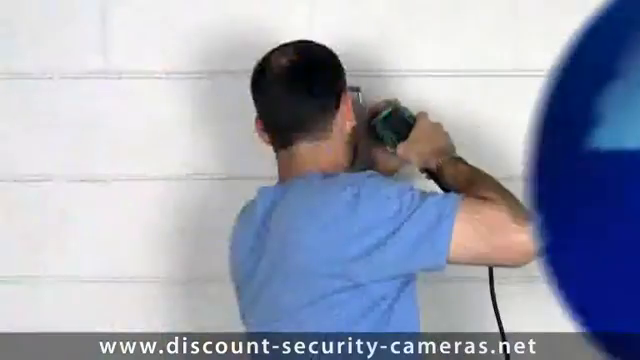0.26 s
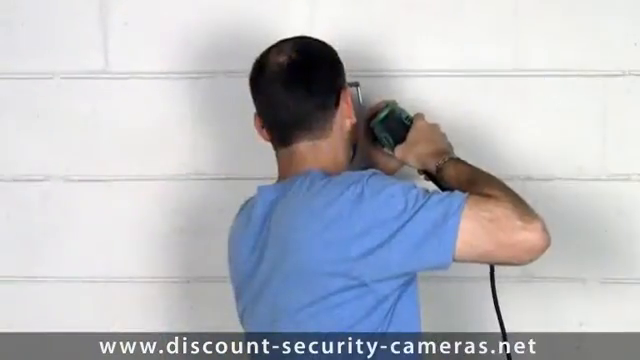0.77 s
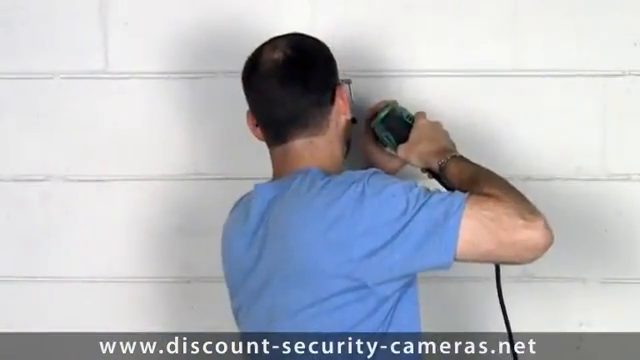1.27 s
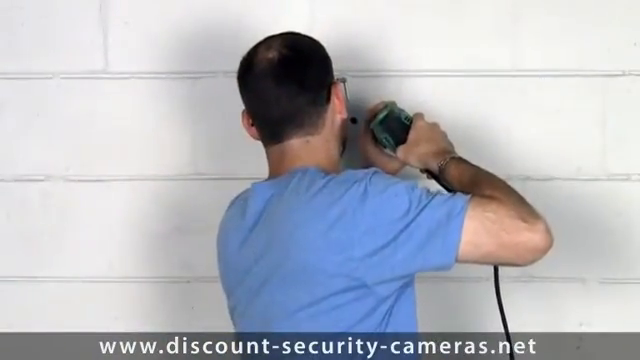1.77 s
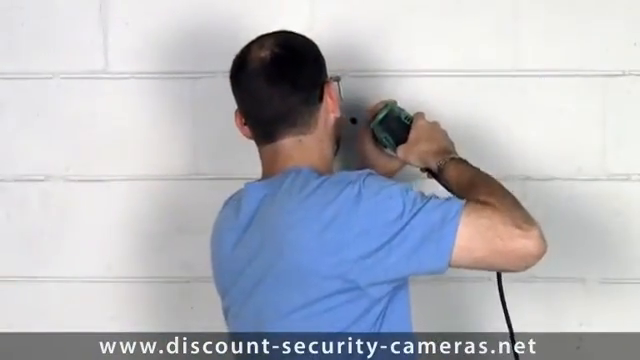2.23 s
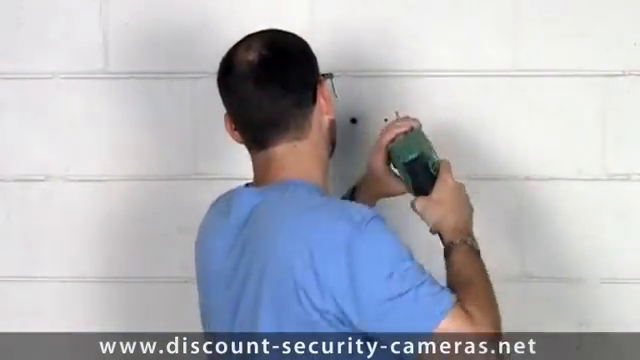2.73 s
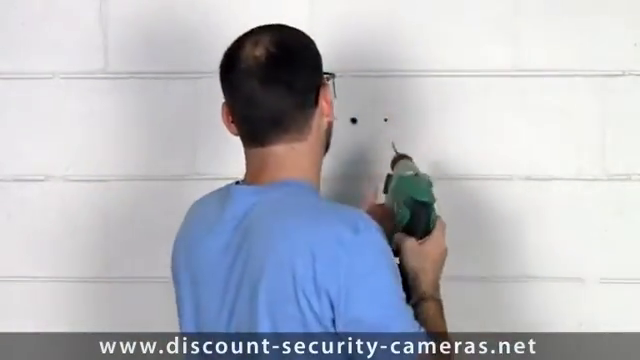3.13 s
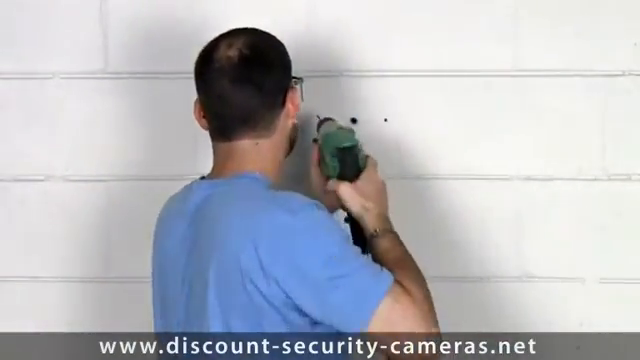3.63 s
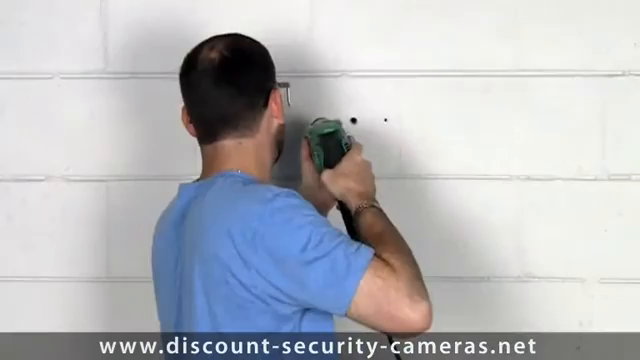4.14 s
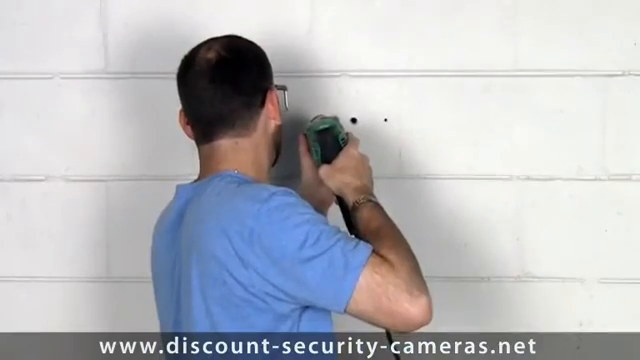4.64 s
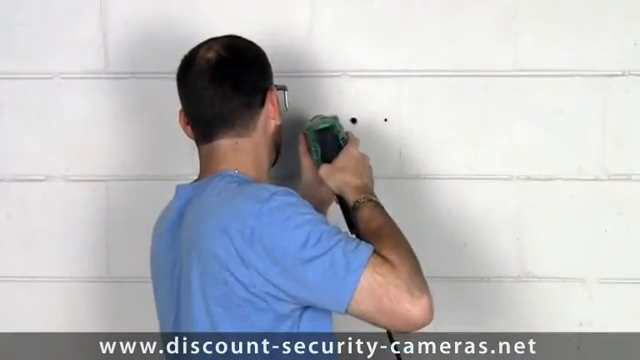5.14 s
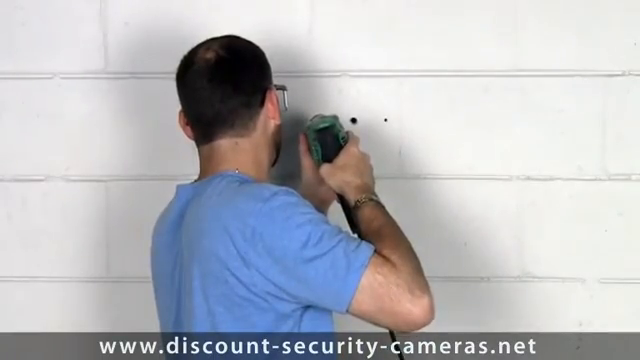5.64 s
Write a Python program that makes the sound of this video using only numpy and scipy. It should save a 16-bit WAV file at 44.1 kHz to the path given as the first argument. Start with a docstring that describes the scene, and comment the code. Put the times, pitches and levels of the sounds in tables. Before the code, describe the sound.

In a hard-walled room, an electric drill bores into masonry, backs out, then its motor coasts slowly to a stop.

```python
"""In a hard-walled room, a corded drill grinds into a concrete block wall, backs off, knocks and
scrapes once more, runs free and coasts to a stop. Grit rings the wall and the bit; gears, fan and
commutator sing at multiples of the armature speed. Under it lie room rumble and a few soft thuds.
One microphone feeds the left input; the idle right input holds only faint hiss."""
import sys
import numpy as np
from scipy import signal
from scipy.fft import rfft, irfft
from scipy.io import wavfile
from scipy.ndimage import uniform_filter1d

SR = 44100
rng = np.random.default_rng(int(sys.argv[2]) if len(sys.argv) > 2 else 0)


def generate_wav(sig):
    """Save sig (samples, or channels by samples) to the path in sys.argv[1] as 16-bit PCM at SR."""
    pcm = np.round(np.clip(np.atleast_2d(sig).T, -1, 1) * 32767).astype(np.int16)
    wavfile.write(sys.argv[1], SR, pcm)


N = 260171
TIME = np.arange(N) / SR
RELEASE_S, RELEASE_SPEED = 2.36, 411  # the trigger is let go at full speed, in rev/s
COASTED_S = np.maximum(TIME - RELEASE_S, 0)

# The gearbox resonance. Each row: pitch in Hz, width in Hz, level in dB.
GEARBOX_RING = [(2042, 35, 6.5)]


def gain_of(db):
    """Decibels to gain."""
    return 10 ** (np.asarray(db) / 20)


def unit_rms(x):
    """Scales to rms 1."""
    return x / np.sqrt(np.mean(x ** 2) + 1e-20)


def curve(rows):
    """Joins (seconds, value) points into an envelope."""
    return np.interp(TIME, *np.transpose(rows))


def colour(hz, broad, rings=()):
    """Gain at hz of a broad spectrum with resonances on top, which pass little below their pitch."""
    points_hz, points_db = np.transpose(broad)
    power = gain_of(2 * np.interp(np.log(hz + 1), np.log(points_hz + 1), points_db))
    peaks = (gain_of(2 * db) * np.minimum(hz / pitch, 1) ** 4 / (1 + (2 * (hz - pitch) / width) ** 2)
             for pitch, width, db in rings)
    return np.sqrt(power + sum(peaks))


def ringing(hz, rings):
    """Gain at hz of steep resonances alone."""
    return sum(gain_of(db) / (1 + (2 * (hz - pitch) / width) ** 2) for pitch, width, db in rings)


def rolloff(hz, corner_hz, steepness):
    """Gain at hz of a low-pass."""
    return 1 / (1 + (hz / corner_hz) ** steepness)


def filtered(x, gain):
    """Passes x through gain(hz) and scales to rms 1."""
    hz = np.fft.rfftfreq(2 ** 19, 1 / SR)
    return unit_rms(irfft(rfft(x, 2 ** 19) * gain(hz))[:N])


def waver(seconds):
    """Slow random drift of rms 1."""
    size = int(seconds * SR)
    return unit_rms(uniform_filter1d(uniform_filter1d(rng.standard_normal(N), size), size))


def grit(per_s, spread_db):
    """Sparse clicks of uneven size."""
    size = gain_of(spread_db * np.minimum(rng.exponential(1, N), 4)) * rng.standard_normal(N)
    return unit_rms(size * (rng.random(N) < per_s / SR))


def idle_hiss(live):
    """Hiss of the idle input; a gate keyed by the live input mutes it, treble first."""
    # The hiss colour. Each row: frequency in Hz, density in dB.
    spectrum = [(20, -3), (90, -7), (200, -18), (400, -19), (12000, -20.5)]
    hiss = gain_of(-70) * filtered(rng.standard_normal(N), lambda hz: colour(hz, spectrum))
    bass = signal.sosfiltfilt(signal.butter(4, 200, fs=SR, output="sos"), hiss)
    key_db = 10 * np.log10(abs(uniform_filter1d(live ** 2, 9000)) + 1e-12)
    bass_gate = np.clip((-26 - key_db) / 9, 0, 1)
    treble_gate = np.clip((-41 - key_db) / 1.44, 0, 1)
    return bass * bass_gate + (hiss - bass) * treble_gate


def room_rumble():
    """Low room tone over microphone hiss, swelling in over the first second, then settling a little."""
    # The room tone's colour. Each row: frequency in Hz, density in dB.
    spectrum = [(18, -39.5), (30, -9.5), (64, -5.5), (153, -2), (293, -8.5), (390, -8), (700, -14.5),
                (1080, -18.5), (2000, -25.5), (4000, -32), (9000, -35), (12000, -37.5)]
    # Its swell. Each row: time in seconds, gain in dB.
    swell = [(0, -30), (.9, 6.5), (1.3, 0.5)]
    rumble = filtered(rng.standard_normal(N), lambda hz: colour(hz, spectrum))
    return gain_of(-60 + curve(swell) + waver(0.11)) * rumble


def thuds():
    """Soft thuds near the microphone, each a few low cycles under a smooth window."""
    # The thuds. Each row: start in seconds, peak in dB, pitch in Hz, length in seconds.
    bumps = [(1.699, -48, 100, .03), (2.67, -43, 110.6, 0.015), (2.722, -38, 80, 0.017),
             (4.501, -47.5, 100, 0.023), (4.838, -43.5, 114, 0.018), (4.98, -31, 104, 0.023),
             (5.045, -46, 110, 0.019)]
    out = np.zeros(N)
    for start, db, hz, length in bumps:
        t = np.arange(round(length * SR)) / SR
        cycles = -np.cos(2 * np.pi * hz * (t - length / 2))
        out[round(start * SR):][:len(t)] += gain_of(db) * np.hanning(len(t)) * cycles
    return out


def armature_speed():
    """Speed in rev/s: driven, then braked to rest by steady friction and drag that grows with speed."""
    # The motor under power. Each row: time in seconds, speed in rev/s.
    driven = [(0, 371), (1.22, 372), (1.6, 396), (1.8, 400), (2.3, 410), (2.36, 411)]
    drag, friction = 0.2153, 447.3  # 1/s; rev/s at which drag equals friction
    coasting = (RELEASE_SPEED + friction) * np.exp(-drag * COASTED_S) - friction
    return np.where(TIME < RELEASE_S, curve(driven), np.maximum(coasting, 0))


def speed_db(speed):
    """Speed in dB against full speed."""
    return 20 * np.log10(np.maximum(speed, 1) / RELEASE_SPEED)


def order_tone(angle, order, db, rough, flutter_db):
    """A tone at a multiple of the armature speed, with rough phase and fluttering level."""
    jitter = rough * waver(0.0041)
    level = np.sqrt(2) * gain_of(db + flutter_db * waver(0.012))
    return level * np.cos(order * angle + jitter + 2 * np.pi * rng.random())


def shaft_hum(angle):
    """Unbalance shakes the drill once a turn."""
    # The hum's envelope. Each row: time in seconds, level in dB.
    envelope = [(0, -65), (1.3, -56.5), (2.0, -56), (2.6, -57), (2.7, -69), (3.1, -80)]
    return order_tone(angle, 1, curve(envelope), rough=0.092, flutter_db=6.5)


def gearbox_rattle():
    """The running gears shake the gearbox ring, which fades after release."""
    ring = filtered(rng.standard_normal(N), lambda hz: ringing(hz, GEARBOX_RING))
    return gain_of(-46 - 22 * COASTED_S) * ring


def gear_song(speed, angle):
    """The gears sing once the load is off; resonances lift the tone that passes through them."""
    # The gear tones, in multiples of the armature speed, and their base levels in dB.
    orders = (5, 12, 17, 19, 24)
    levels_db = (-48, -52, -52, -65, -68.5)
    # A broader ring, crossed while speeding up. Each row: pitch in Hz, width in Hz, level in dB.
    lower_ring = [(1925, 80, -5)]
    free_s, rise_db_s, fade_db_s = 1.32, 110, 130
    song = np.zeros(N)
    for order, db in zip(orders, levels_db):
        lift = 0.75 + ringing(order * speed, GEARBOX_RING + lower_ring)
        song += lift * order_tone(angle, order, db, rough=0.11, flutter_db=-2.5)
    return gain_of(-rise_db_s * np.maximum(free_s - TIME, 0) - fade_db_s * COASTED_S) * song


def commutator_whine(speed, angle):
    """Brushes cross 24 uneven bars: a rough, falling whine that stands out while coasting."""
    # The partials: multiples of the armature speed, base levels in dB, dB lost per dB of speed lost.
    orders = (24, 48, 72, 96)
    levels_db = (-5.5, -9.5, -8, -10)
    slopes = (0.59, 0.46, 0.7, 0.72)
    # The whine's path to the air. Each row: frequency in Hz, gain in dB.
    path = [(1500, -33), (1950, 3), (3000, 4), (4500, 0.5), (6000, -0.5), (6800, 1), (8200, -12),
            (9300, -13)]
    # Rings the lowest partial sweeps through. Each row: pitch in Hz, width in Hz, level in dB.
    rings = [(2290, 820, 7), (3340, 640, 7.5), (4500, 410, 8.5), (7600, 1300, 3.5)]
    whine = np.zeros(N)
    for order, db, slope in zip(orders, levels_db, slopes):
        partial = order_tone(angle, order, db + slope * speed_db(speed), rough=0.68, flutter_db=4)
        whine += partial * colour(order * speed, path, rings if order == orders[0] else ())
    fade_in_db = np.minimum(75 * (TIME - RELEASE_S) - 22, 0)
    return gain_of(-51.5 + fade_in_db) * whine


def motor_noise(speed):
    """Fan air and brush fizz through the casing; rush and treble die first as the motor slows."""
    # The casing's broad voice. Each row: frequency in Hz, gain in dB.
    casing = [(100, -31), (300, -15), (700, -4), (1300, -4), (1720, -4.5), (2000, 2), (2900, 0),
              (3330, -5.5), (5000, -10.5), (5800, -15.5), (7000, -11.5), (8300, -12.5), (9300, -10.5),
              (12000, 4.5)]
    # Casing and vent resonances. Each row: pitch in Hz, width in Hz, level in dB.
    casing_rings = [(965, 170, -8), (1963, 48, 5), (2140, 39, 2.5), (2364, 68, 3.5), (2715, 78, 3.5),
                    (2950, 41, -7), (3700, 82, -3.5), (6630, 150, -11.5), (10240, 260, -21)]
    vent_rings = [(7530, 220, 0), (7950, 300, -5)]
    # The vents face the microphone. Each row: peak time in seconds, level in dB, half length in seconds.
    vent_swells = [(2.0, -20, 0.41), (2.6, -11, .1), (3.312, -3.5, 0.22)]
    # The low rush. Each row: time in seconds, level against the mids in dB.
    rush_envelope = [(1.3, 3.5), (1.6, -1.5), (2.3, -1), (2.6, -0.5), (2.9, -1.5), (3.5, -5), (4.3, -9),
                     (5.0, -10)]
    fizz = rng.standard_normal(N) + 0.46 * grit(per_s=4000, spread_db=4.3)
    body = filtered(fizz, lambda hz: colour(hz, casing, casing_rings))
    rush = filtered(body, lambda hz: rolloff(hz, 1500, 8))
    mids = filtered(body, lambda hz: (1 - rolloff(hz, 1600, 8)) * rolloff(hz, 4200, 4))
    highs = filtered(body, lambda hz: (1 - rolloff(hz, 4600, 4)) * rolloff(hz, 8800, 12))
    air = filtered(body, lambda hz: 1 - rolloff(hz, 9000, 12))
    vent = filtered(fizz, lambda hz: ringing(hz, vent_rings))
    slowed_db = speed_db(speed)
    treble = gain_of(0.83 + 0.44 * slowed_db) * (highs + gain_of(-4 + 1.7 * slowed_db) * air)
    facing = sum(gain_of(db) * np.exp(-((TIME - at) / half) ** 2) for at, db, half in vent_swells)
    vent_gain = gain_of(-15 + 0.96 * slowed_db) + facing
    mix = mids + gain_of(curve(rush_envelope)) * rush + treble + vent_gain * vent
    powered_db = 1.5 * np.exp(-COASTED_S / 0.066)  # extra brush noise while current flows
    level = gain_of(-43.5 + 0.85 * slowed_db + powered_db + 0.61 * waver(0.015))
    return level * np.clip(speed / 12, 0, 1) * mix


def knocks():
    """The bit bounces on the block: a crack and short rings."""
    # The bounces. Each row: start in seconds, level in dB, treble gain in dB.
    bounces = [(1.616, -19, -13), (1.625, -24, 1), (1.634, -28, -6), (1.649, -32, -10), (2.133, -37, -12)]
    # The modes they strike. Each row: pitch in Hz, level in dB, seconds to fall by 60 dB.
    modes = [(409, -12, 0.46), (1240, 8.5, 0.025), (2110, 9, 0.016), (3263, 8, 0.017), (4400, -18, 0.018),
             (7800, 7.5, 0.022), (8800, 3, 0.028), (10900, -16, .02)]
    out, t = np.zeros(N), np.arange(3000) / SR
    attack = np.minimum(t / 0.00032, 1)
    for start, db, treble_db in bounces:
        ring = np.zeros(len(t))
        for hz, mode_db, t60 in modes:
            decay = gain_of(mode_db + treble_db * (hz > 4000) - 60 * t / t60)
            ring += decay * np.sin(2 * np.pi * hz * rng.uniform(0.88, 1.03) * t)
        crack = 1.7 * gain_of(treble_db - 60 * t / 0.039) * rng.standard_normal(len(t))
        out[round(start * SR):][:len(t)] += gain_of(db) * (ring + crack) * attack / 2
    return out


def pressure_db():
    """Grinding level: each press of the bit on the block builds, then fades as it eases."""
    # The presses. Each row: start in seconds, easing time in seconds, level in dB, fade in dB/s.
    presses = [(-.1, 0.564, -26, 109), (0.607, 0.979, -26.5, 53), (1.057, 1.052, -29, 150),
               (1.093, 1.13, -32, 42), (1.623, 1.623, -26, 250), (1.674, 1.72, -32.5, 86),
               (1.874, 1.943, -44, 300)]
    rise_db_s = 1360
    levels_db = (db - rise_db_s * np.maximum(start - TIME, 0) - fade * np.maximum(TIME - ease, 0)
                 for start, ease, db, fade in presses)
    return 10 * np.log10(sum(gain_of(2 * db) for db in levels_db) + 1e-12)


def grinding():
    """Grit breaks under the tip; each cutting edge bites once a turn and makes the bit sing."""
    # The two cutting edges. Each row: place in the turn from 0 to 1, dwell in turns, level in dB.
    edges = [(.23, 0.089, 5), (.83, 0.043, 1)]
    # The wall's broad voice. Each row: frequency in Hz, gain in dB.
    block = [(30, -65), (60, -40), (100, -16), (150, -19.5), (220, -10), (310, -6), (575, -9),
             (1000, -15.5), (2600, -5.5), (5000, -6.5), (6300, -11), (9000, -15), (12000, -18.5)]
    # Resonances of the wall and the steel bit. Each row: pitch in Hz, width in Hz, level in dB.
    block_rings = [(238, 7, -11.5), (338, 12, -1.5), (392, 60, -5.5), (766, 7.6, -1.5), (980, 10, -27),
                   (1220, 11, -18), (1297, 55, 1), (1423, 335, -1), (2020, 150, -2), (2694, 30, -2),
                   (2613, 125, -0.5), (3070, 13.5, 6), (3371, 19, -3), (3700, 18, -26), (4160, 13, -21),
                   (4270, 40, -23.5), (4550, 11, 1), (5110, 140, -14)]
    bit_rings = [(7380, 300, 5), (7970, 230, -1)]
    # Wall hum, fading as the hole deepens. Each row: pitch in Hz, relative level in dB, fade in dB/s.
    wall_hum = [(264.6, -22, 3.0), (424.3, -13, 10)]
    chuck_hz = 33
    turns = np.cumsum(chuck_hz * (1 + 0.0087 * waver(0.33))) / SR
    bite = sum(gain_of(db) * np.exp(-(((turns - at + .5) % 1 - .5) / dwell) ** 2)
               for at, dwell, db in edges)
    bite *= gain_of(0.57 * waver(0.013))
    crunch = grit(per_s=20000, spread_db=1) * (1 + 0.33 * bite)
    wall = filtered(crunch, lambda hz: colour(hz, block, block_rings))
    bit = filtered(rng.standard_normal(N) * (0.42 + bite), lambda hz: ringing(hz, bit_rings))
    press_db = pressure_db()
    bit_db = -12 + 3.9 * np.minimum(press_db + 28, 0)  # the bit falls silent first as pressure eases
    drone = np.zeros(N)
    for hz, db, fade in wall_hum:
        phase = 2 * np.pi * hz * TIME + 0.51 * waver(0.08)
        drone += gain_of(db - fade * TIME) * np.sqrt(2) * np.sin(phase)
    return gain_of(press_db + 0.5 * waver(0.045)) * (wall + gain_of(bit_db) * bit + drone)


def room_reverb(direct):
    """Hard walls add three dense tails, which slowly crossfade as the drill shifts in the hands."""
    t60_s, wet_gain, sway_hz = 0.4, gain_of(-7), 0.44
    t = np.arange(SR // 2) / SR
    tails = rng.standard_normal((3, len(t))) * gain_of(-60 * t / t60_s) * (t > .004)
    tails *= wet_gain / np.linalg.norm(tails, axis=1, keepdims=True)
    sway = np.sqrt(2 / 3) * np.cos(np.pi * (sway_hz * TIME + np.arange(3)[:, None] / 3))
    reflections = signal.oaconvolve(direct * sway, tails, axes=1).sum(0)[:N]
    return (direct + reflections) / np.hypot(1, wet_gain)  # keeps the power unchanged


def scene():
    """Everything reaches the one microphone on the left."""
    rumble = room_rumble()
    speed = armature_speed()
    drill = grinding() + motor_noise(speed)
    angle = 2 * np.pi * np.cumsum(speed * (1 + .0015 * waver(0.0098))) / SR
    drill += gear_song(speed, angle) + commutator_whine(speed, angle) + shaft_hum(angle)
    drill += gearbox_rattle() + knocks()
    left = room_reverb(drill) + thuds() + rumble  # the thuds are too near for reverb
    return np.array([left, np.zeros(N)])


def record(dry):
    """Preamp gain on the left, gated hiss on the right, and a steep low-pass on both."""
    live = gain_of(4.5) * dry[0]
    both = np.array([live, idle_hiss(live)])
    lowpass = signal.firwin(1023, 11880, window=("kaiser", 10), fs=SR)
    return signal.oaconvolve(both, lowpass[None], "same")


dry = scene()
out = record(dry)
generate_wav(out)
```